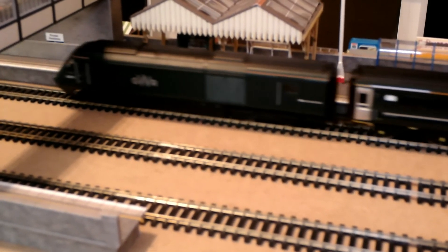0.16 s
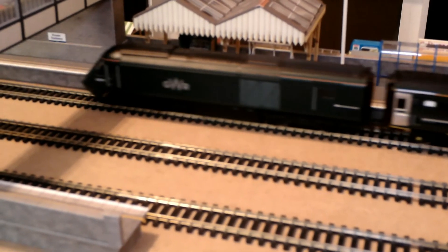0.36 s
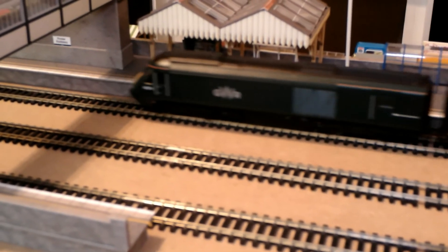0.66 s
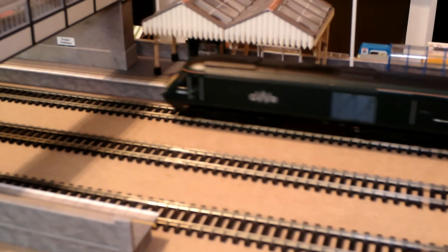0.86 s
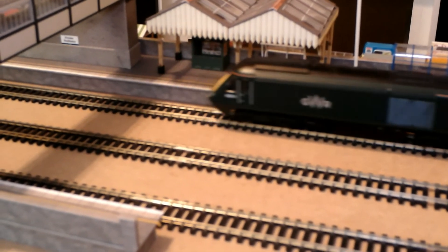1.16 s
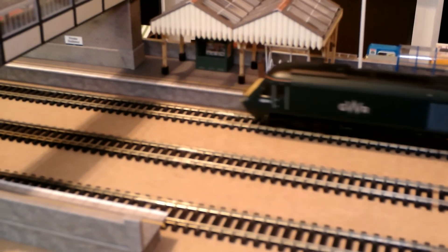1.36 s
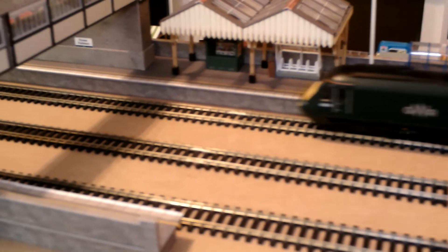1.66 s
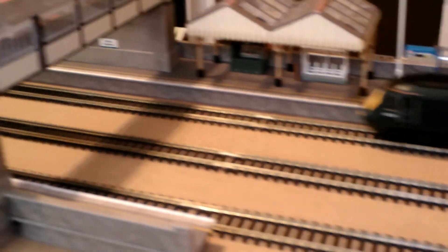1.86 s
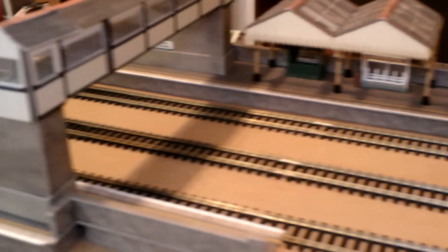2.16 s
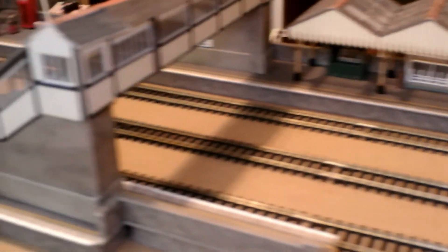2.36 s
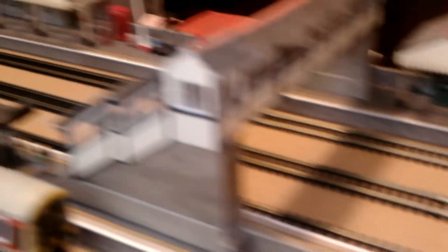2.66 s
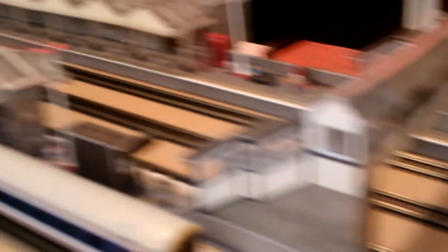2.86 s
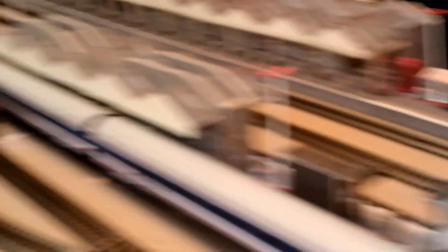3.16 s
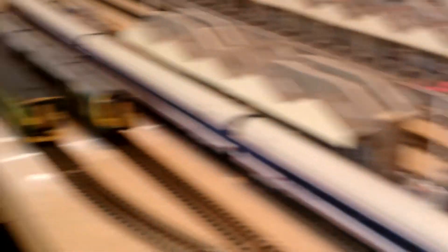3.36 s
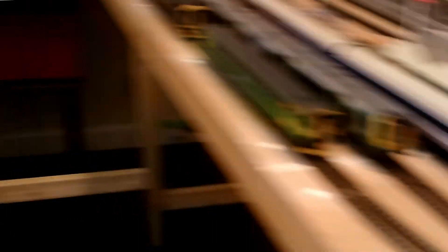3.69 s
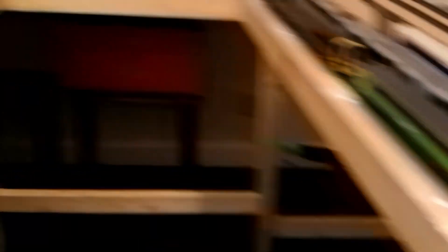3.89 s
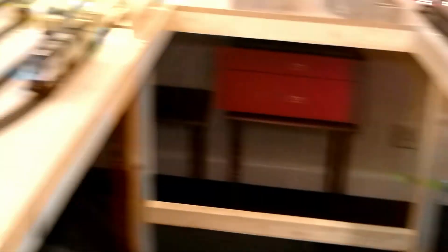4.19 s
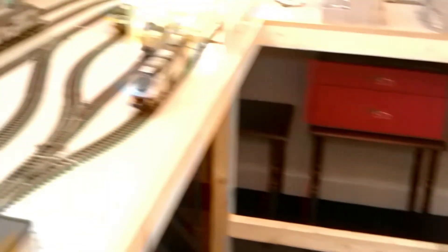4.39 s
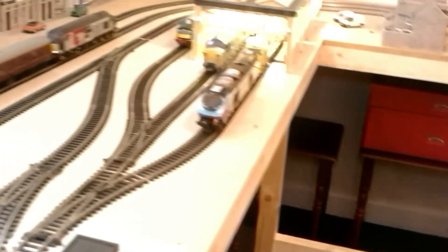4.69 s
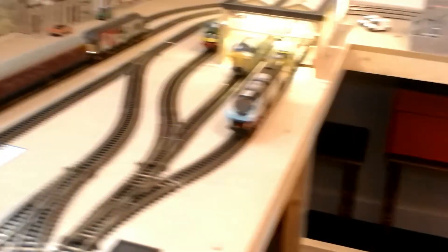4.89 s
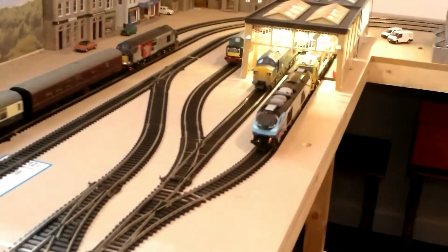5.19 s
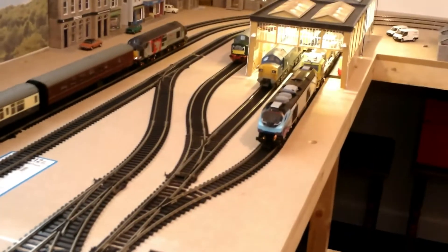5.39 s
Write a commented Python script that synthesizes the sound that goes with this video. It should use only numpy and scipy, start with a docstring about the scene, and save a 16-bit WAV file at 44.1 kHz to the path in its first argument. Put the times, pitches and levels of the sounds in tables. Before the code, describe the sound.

Model trains roll along a layout with a steady wheel rush, one drawing near with rapid gear chatter, clacks and ever harder knocks.

```python
"""Two model trains roll over a wooden baseboard in a small room, one microphone close by.
The first runs away with a rush of small wheels on rough rail that rings in board and track.
The second draws near, knocking ever harder and clacking over rail joints, its drive chattering
some 26 times a second. Behind them the rails hiss, wheel discs sing and motors hum in the board."""
import sys
import numpy as np
from scipy import signal
from scipy.fft import rfft, irfft, next_fast_len
from scipy.io import wavfile
from scipy.ndimage import uniform_filter1d, map_coordinates

SR = 44100
rng = np.random.default_rng(int(sys.argv[2]) if len(sys.argv) > 2 else 0)


def bounce(signal):
    """Save signal as a 16-bit WAV file at the path given by the first command-line argument."""
    frames = np.transpose(np.atleast_2d(signal))
    limited = np.clip(frames, -1, 1)
    pcm = np.round(limited * 32767).astype(np.int16)
    wavfile.write(sys.argv[1], SR, pcm)


N = 244439

# the second train's part of the wheel rush: (time [s], share [0-1])
SECOND_SHARE = [(0, 0.28), (2.2, 0.67), (3.0, 0.4), (4.0, 0.61), (5.54, 1)]
# spectrum of the second train's wheels and gears: (frequency [Hz], level [dB])
SECOND_SPECTRUM = [(500, -57), (620, -11), (760, -4), (980, -3.5), (1200, -2.5), (1450, 8.5), (1750, 4),
                   (2200, 3.5), (2650, -6.5), (3000, -10.5), (3500, -30), (3780, -20.5), (4050, -25),
                   (4500, -85)]


def rolling():
    """Wheels of both trains rush over rough rail; board, body shells and bogies radiate the sound."""
    # strength of each radiating part: (time [s], baseboard [dB], body shells [dB], bogies [dB])
    part_levels = [(0, -35.5, -32, -35), (.11, -38, -35, -37.5), (.19, -34, -30, -33.5),
                   (.28, -33.5, -29.5, -35.5), (.39, -37, -30.5, -27), (.47, -35.5, -30, -31),
                   (.55, -31, -27.5, -29), (.65, -36.5, -29.5, -30), (.72, -33.5, -29, -30.5),
                   (.95, -36, -32.5, -31.5), (1.04, -33, -25.5, -33.5), (1.17, -34.5, -27, -30.5),
                   (1.3, -36, -30, -32.5), (1.42, -33.5, -28.5, -30), (1.68, -36, -32, -33.5),
                   (1.83, -32.5, -30, -29), (2.0, -35, -30, -28.5), (2.1, -36.5, -34.5, -30.5),
                   (2.24, -34, -29, -27), (2.3, -37, -32.5, -33.5), (2.46, -37.5, -35.5, -33.5),
                   (2.62, -37.5, -31, -33.5), (2.7, -38, -33, -37.5), (2.85, -33.5, -33, -33.5),
                   (2.96, -33.5, -34.5, -38), (3.06, -34.5, -34, -33.5), (3.14, -36.5, -37, -32),
                   (3.26, -30.5, -31.5, -33), (3.34, -41.5, -30.5, -36.5), (3.45, -33, -34, -31.5),
                   (4.0, -32.5, -32.5, -32.5), (4.4, -31, -32, -29), (4.7, -33, -35, -34),
                   (4.88, -33.5, -28, -26), (5.15, -31, -29, -25), (5.5, -34, -29, -28.5)]
    # spectrum of the first train's wheels: (frequency [Hz], level [dB])
    first_spectrum = [(500, -41.5), (620, -12.5), (720, -6), (950, -4), (1200, -7), (1420, -27.5),
                      (1620, -8), (1830, -4), (2070, -5.5), (2330, 1), (2650, -7), (3000, -12.5),
                      (3500, -13.5), (4300, -34.5)]
    share = in_time(SECOND_SHARE)[0]
    force = contacts(per_s=5000, spread_db=2.5)
    first = rms_one(coloured(force, first_spectrum))
    second = rms_one(coloured(force, SECOND_SPECTRUM))
    rush = scattered((1 - share) * first + share * second, wet_db=4.0, t60=0.17, count=22)
    sound = from_db(-27) * steadied(rush, smooth_s=0.87) + track() + brief_rings()
    bands_hz = [(560, 1200), (1200, 2100), (2100, 4500)]  # board, shells, bogies
    # each part rattles a little on its own, and all together with the bumps of the rail
    parts = sum(from_db(db + 0.96 * drift(35)) * steadied(band(sound, *edges), smooth_s=0.092)
                for db, edges in zip(in_time(part_levels), bands_hz))
    bumps_db = -0.18 + 0.78 * drift(45)
    duck_db = -2 * share ** 2  # the second train's wheels run more quietly
    return parts * from_db(bumps_db + duck_db)


def track():
    """Each train wakes the resonances of its own stretch of board and track."""
    # resonances under the first train: (frequency [Hz], width [Hz], level [dB])
    first_modes = [(882, 17, -39), (949, 45, -37.5), (1391, 12, -39.5), (1467, 27, -42), (1805, 17, -38),
                   (1900, 28, -43.5), (2270, 12, -42), (2454, 25, -44), (2670, 28, -48), (3350, 220, -50)]
    # their strength as it goes by and away: (time [s], level [dB])
    leaving = [(0, -2.5), (.5, -1.5), (1.3, 0.5), (2.3, -2.5), (3.2, -7.5), (5.5, -24)]
    # resonances under the second train: (frequency [Hz], width [Hz], level [dB])
    second_modes = [(774, 28, -48.5), (946, 45, -37.5), (1120, 67, -42), (1396, 26, -55.5), (1496, 37, -39),
                    (1863, 27, -39.5), (2476, 28, -46.5), (3562, 51, -49.5)]
    first = from_db(in_time(leaving)[0]) * woken(first_modes, swell_db=2.5, smooth_s=0.13)
    second = woken(second_modes, swell_db=5.5, smooth_s=0.47)
    return first + passing(nearest_s=3.63, half_s=0.84) * second


def brief_rings():
    """A passing wheel catches a single resonance, which swells into a short, wavering whine."""
    # caught resonances: (time [s], half length [s], frequency [Hz], width [Hz], level [dB])
    rings = [(0.27, .25, 1410, 10, -38), (0.323, .22, 1680, 9, -38.5), (0.33, 0.34, 1940, 6.9, -38),
             (.8, .22, 1550, 14, -37.5), (1.15, .16, 1436, 12, -39), (1.42, 0.11, 2573, 10, -40),
             (1.9, 0.18, 1840, 14, -41), (1.889, 0.063, 1410, 9.2, -38.5), (2.95, .35, 960, 11, -40),
             (0.41, 0.29, 3100, 23, -46.5), (0.597, 0.37, 3520, 35, -48), (1.2, .25, 3570, 35, -48.5),
             (0.429, 0.074, 2413, 50, -33), (0.735, 0.066, 2500, 17, -33), (0.88, 0.14, 2380, 11, -36),
             (1.2, 0.14, 1824, 20, -32), (1.223, 0.21, 2700, 77, -36.5), (1.44, 0.22, 2275, 5, -32.5),
             (1.846, 0.038, 2700, 34, -40), (2.1, 0.13, 2690, 6.3, -38.5), (2.21, 0.052, 2134, 53, -31),
             (2.238, 0.11, 2450, 33, -32.5), (2.837, 0.1, 1387, 20, -31), (3, 0.17, 1110, 38, -34),
             (3.565, 0.11, 945, 14, -32.5), (3.07, 0.045, 3260, 280, -39), (3.75, .06, 2340, 23, -29.5),
             (4.084, 0.01, 3450, 53, -29), (4.151, .025, 2640, 30, -28), (4.304, 0.031, 1120, 44, -28.5),
             (4.384, 0.035, 1005, 30, -28), (4.552, .025, 815, 30, -31), (5.136, .013, 2820, 60, -30.5)]
    return sum(passing(s, half_s) * woken([mode], swell_db=3.5, smooth_s=0.084)
               for s, half_s, *mode in rings)


def chatter(pulse):
    """Once a turn the gears rub and rattle the second train's body; the teeth add a faint bright edge."""
    # resonances of the body: (frequency [Hz], width [Hz], level [dB])
    body_modes = [(719, 10, 1), (893, 117, 0), (1035, 150, 0.5), (1408, 106, 8.5), (1495, 16, 3),
                  (1600, 48, -9.5), (1570, 20, -18), (2050, 32, 10), (2230, 47, -2), (2504, 30, 4),
                  (2700, 44, -2), (2800, 17, -3.5), (3270, 180, 4)]
    # spectrum of the gear teeth: (frequency [Hz], level [dB])
    teeth_spectrum = [(3300, -5), (3600, -5), (4050, 3), (4400, -19), (5500, -8.5), (6300, -12.5)]
    # strength of the chatter: (time [s], body [dB], gears [dB])
    levels = [(3.24, -31.5, -44), (3.6, -34.5, -35), (3.98, -33, -34), (4.12, -32, -29.5),
              (4.33, -25.5, -28.5), (4.45, -29.5, -40), (4.7, -28.5, -35), (4.84, -25.5, -27.5),
              (5.2, -26.5, -30), (5.5, -28, -29)]
    force = contacts(per_s=5000, spread_db=2.0)
    ring = ringing(band(force, 600, 2760), body_modes, wander_db=4.0)
    rasp = rms_one(coloured(force, SECOND_SPECTRUM)) + from_db(13) * ring
    body = steadied(band(rasp, 616, 2160), smooth_s=0.006)
    teeth = from_db(-14.5) * rms_one(coloured(force, teeth_spectrum))
    gears = steadied(band(rasp, 2250, 4900), smooth_s=0.018) + teeth
    body_db, gears_db = in_time(levels)
    return pulse * (from_db(body_db) * body + from_db(gears_db) * gears)


def drive_turns():
    """One swell for each turn of the second train's drive, a little uneven and with a slight limp."""
    start_s, turn_s, jitter_s = 3.236, 0.03838, 0.0018
    limp_db, scatter_db = -0.5, 1.6
    turn = np.arange(int((N / SR - start_s) / turn_s) + 1)
    late, strength = rng.standard_normal((len(turn), 2)).T
    times = start_s + turn * turn_s + jitter_s * late
    levels = limp_db * (-1) ** turn + scatter_db * strength
    return sum(from_db(db) * burst(s, rise_s=0.0066, fall_s=0.011) for s, db in zip(times, levels))


def knocks():
    """A jolt shakes the main mode of the second train's body and rattles the upper modes of its shell."""
    # jolts: (time [s], peak [dB], pitch [Hz], fall [s], shell rattle [dB])
    jolts = [(2.775, -25, 1430, .016, -42), (2.818, -29, 1465, .012, -41), (2.855, -26, 1460, .008, -42),
             (2.877, -26, 1410, 0.0055, -46), (3.038, -24, 1480, .014, -35), (3.24, -29, 948, 0.021, -44),
             (3.272, -25, 1365, .012, -38), (3.478, -26, 980, 0.0072, -28), (3.629, -22, 943, 0.0091, -31),
             (3.817, -24, 960, 0.0057, -33), (3.857, -24, 1400, 0.0068, -35), (3.931, -31, 1400, .006, -29),
             (3.969, -24, 900, 0.019, -31), (4.075, -20, 1365, .012, -28), (4.231, -27, 1400, .006, -35),
             (4.303, -17.5, 1290, .006, -33), (4.379, -18.5, 1325, .007, -22.5),
             (4.458, -18.5, 1387, .007, -34), (4.535, -20, 1360, 0.0072, -39), (4.586, -21, 1415, .01, -46),
             (4.61, -19.5, 1420, .006, -34), (4.657, -25, 1420, 0.0077, -28),
             (4.764, -16, 1450, 0.0079, -24.5), (4.805, -19, 1508, 0.011, -31),
             (4.841, -11, 1510, .009, -18), (4.886, -16.5, 1444, .007, -21.5),
             (4.92, -20, 1552, 0.0043, -36), (4.963, -26, 1550, .008, -28),
             (4.998, -7, 1587, 0.0047, -19.5), (5.04, -12.5, 1460, 0.0076, -27),
             (5.087, -23, 1470, .008, -23), (5.12, -24, 1500, .012, -24.5), (5.157, -19, 1515, .009, -22.5),
             (5.195, -21.5, 1480, 0.011, -25.5), (5.227, -15, 1546, 0.0068, -22),
             (5.308, -15, 1508, 0.014, -28), (5.356, -16.5, 1494, .009, -24),
             (5.386, -7.5, 1498, 0.0046, -35), (5.425, -21, 1490, 0.011, -35),
             (5.463, -17.5, 1517, .008, -30), (5.514, -20, 1490, 0.015, -21.5)]
    # upper modes of the shell: (frequency [Hz], width [Hz], level [dB])
    shell_modes = [(2210, 51, -0.5), (2495, 64, 4.5), (2688, 65, 4), (2940, 55, -8), (3236, 70, -5.5),
                   (3544, 63, -7), (3830, 120, -20)]
    phase_per_hz = 2 * np.pi * np.cumsum(1 + 0.035 * drift(300)) / SR  # the pitch wavers
    shell = ringing(contacts(per_s=5000, spread_db=3.0), shell_modes, wander_db=4.0)
    shell = steadied(band(shell, 1850, 4080), smooth_s=0.0089)
    out = np.zeros(N)
    for s, db, hz, fall_s, shell_db in jolts:
        out += from_db(db) * burst(s, rise_s=0.0032, fall_s=fall_s) * np.sin(hz * phase_per_hz)
        out += from_db(shell_db) * burst(s, rise_s=0.0039, fall_s=0.0088) * shell
    return out


def rail_joints():
    """A wheel drops over a rail joint: a short clack with a metallic ring."""
    # wheel drops: (time [s], level [dB])
    drops = [(3.404, -27.5), (3.705, -25), (3.746, -19), (3.763, -28), (4.043, -26), (4.081, -19),
             (4.124, -25), (4.153, -23)]
    # spectrum of the clack: (frequency [Hz], level [dB])
    spectrum = [(700, -3), (950, -5), (1500, -2), (2500, 7), (3000, -2), (3600, -1.5), (4200, -15)]
    # resonances of rail and bogie: (frequency [Hz], width [Hz], level [dB])
    modes = [(1880, 77, -1.5), (2190, 79, 3), (2600, 65, -3), (3480, 60, -7)]
    force = contacts(per_s=4500, spread_db=1.5)
    ring = ringing(band(force, 1180, 3850), modes, wander_db=1.0)
    clack = rms_one(coloured(force, spectrum)) + from_db(-0.5) * ring
    clack = steadied(scattered(clack, wet_db=3.0, t60=0.053, count=6), smooth_s=0.0095)
    return clack * sum(from_db(db) * burst(s, rise_s=0.004, fall_s=0.014) for s, db in drops)


def rails(pulse):
    """Metal slides on metal: a fine hiss that swells with each turn of the drive, and singing discs."""
    # strength of the hiss: (time [s], level [dB])
    levels = [(0, -51), (.3, -49), (.6, -50), (.8, -51), (1.15, -49.5), (1.45, -50.5), (2.1, -50),
              (2.35, -51.5), (2.9, -52), (3.1, -50.5), (3.35, -53.5), (3.5, -51), (3.78, -50), (4.0, -55),
              (4.35, -51.5), (4.6, -56), (4.9, -52), (5.5, -50.5)]
    # spectrum of the hiss: (frequency [Hz], level [dB])
    spectrum = [(2800, -4), (3900, -0.5), (4700, 4.5), (5300, 0), (6600, 2), (7300, -1), (7800, -9),
                (8400, -9), (8750, -6), (9300, -10), (9900, -17), (12000, -22), (14800, -24),
                (15500, -38.5)]
    force = contacts(per_s=20000, spread_db=3.0)
    hiss = from_db(in_time(levels)[0]) * rms_one(coloured(force, spectrum))
    singing = wheel_discs()
    flutter = from_db(1.43 * drift(50))
    return flutter * ((1 + 0.23 * pulse) * hiss + singing)


def wheel_discs():
    """One wheel disc sings loudest, two others above and below it; each wavers in pitch and strength."""
    # discs singing on the rails: (time [s], level [dB], pitch [Hz])
    song = [(.12, -72, 6170), (.3, -57, 6150), (.58, -52.5, 6160), (.9, -59, 6230), (1.15, -56, 6190),
            (1.6, -55, 6150), (2.25, -61, 6270), (2.8, -64, 6170), (3.2, -57.5, 6170), (3.47, -57, 6180),
            (3.65, -56, 6160), (3.77, -47, 6160), (3.9, -58, 6190), (4.2, -55, 6130), (4.65, -61, 6130),
            (4.97, -52, 6150), (5.15, -58, 6190), (5.29, -50, 6210), (5.5, -60, 6180)]
    level_db, pitch_hz = in_time(song)
    wander_hz, waver_db = 18, 4.5
    out = np.zeros(N)
    for offset_hz, db in [(-80, -6), (0, 0), (80, -6)]:
        hz = pitch_hz + offset_hz + wander_hz * (drift(12) + drift(150))
        out += from_db(db + waver_db * drift(25)) * np.sin(2 * np.pi * np.cumsum(hz) / SR)
    return from_db(level_db) * rms_one(out)


def baseboard():
    """Motors and wheels make the board hum in its lowest modes and rumble."""
    # strength of the board's sound: (time [s], motor hum [dB], rumble [dB])
    levels = [(0, -53.5, -48), (.9, -49.5, -47), (2.6, -51.5, -47.5), (3.4, -50.5, -49.5), (4.3, -51, -50),
              (5.15, -49, -47.5)]
    # spectrum of the rumble: (frequency [Hz], level [dB])
    spectrum = [(20, -9), (50, -12), (80, -6), (110, 0.5), (160, -20.5), (240, 0), (350, -1), (520, 2),
                (650, -3.5), (1000, -7.5)]
    # lowest modes of the board: (frequency [Hz], width [Hz], level [dB])
    modes = [(134, 13, -3.5), (205.3, 9.1, -5.5)]
    hum_db, rumble_db = in_time(levels)
    rumble = rms_one(coloured(rng.standard_normal(N), spectrum)) * dips(share=0.98)
    hum = ringing(band(rng.standard_normal(N), 65, 313), modes, wander_db=4.5)
    return from_db(rumble_db) * rumble + from_db(hum_db) * steadied(hum, smooth_s=0.22)


def dips(share):
    """Gain that sinks briefly at each dip, by `share` of its depth."""
    # dips of the treble and the rumble: (time [s], depth [dB])
    depths = [(.5, 4), (0.865, 9), (.949, 8), (1.058, 4), (1.355, 12), (1.8, 4), (1.877, 55), (3.597, 6),
              (3.678, 5), (4.084, 10), (4.586, 61), (5.13, 13)]
    t, half_s = np.arange(N) / SR, 0.011
    return from_db(-share * sum(db * np.exp(-np.abs((t - s) / half_s) ** 3) for s, db in depths))


def room(x, t60, wet_db):
    """Direct sound reaches the microphone with a short diffuse tail behind it."""
    age = np.arange(SR // 2) / SR
    tail = rng.standard_normal(len(age)) * from_db(-60 * age / t60) * (age > .004)
    return x + from_db(wet_db) * signal.fftconvolve(x, tail / np.linalg.norm(tail))[:N]


def scattered(x, wet_db, t60, count):
    """Echoes off the layout change as the train moves: `count` echo patterns, blended in turn."""
    place = np.linspace(0, count - 1, N)
    return sum(np.sqrt(np.maximum(1 - np.abs(place - k), 0)) * room(x, t60, wet_db) for k in range(count))


def contacts(per_s, spread_db):
    """Tiny impacts of rough surfaces, at random times and of uneven size."""
    sizes = from_db(spread_db * np.minimum(rng.exponential(1, N), 4)) * rng.choice([-1, 1], N)
    return rms_one(sizes * (rng.random(N) < per_s / SR))


def ringing(force, modes, wander_db):
    """Modes driven by one force; each swells and fades a little as the train moves."""
    return rms_one(sum((-1) ** k * from_db(db + wander_db * drift(7.7)) * resonance(force, hz, width)
                       for k, (hz, width, db) in enumerate(modes)))


def woken(modes, swell_db, smooth_s):
    """Modes kept ringing by the wheels; each swells and fades as they move along the track."""
    out = np.zeros(N)
    for hz, width, db in modes:
        ring = resonance(resonance(rng.standard_normal(N), hz, width), hz, 6 * width)
        out += from_db(db + swell_db * drift(4.125)) * steadied(ring, smooth_s)
    return out


def steadied(x, smooth_s):
    """Many contacts share the load, so the strength of their sound stays even, near rms 1."""
    power = uniform_filter1d(x * x, max(int(smooth_s * SR), 1))
    return x / np.sqrt(np.maximum(power, 0) + np.mean(x * x) / 100)


def passing(nearest_s, half_s):
    """Gain of something going by: 1 at its nearest, a half at `half_s` on either side."""
    return 1 / (1 + ((np.arange(N) / SR - nearest_s) / half_s) ** 4)


def burst(s, rise_s, fall_s):
    """Envelope that swells from time s and dies away."""
    out, age = np.zeros(N + SR), np.arange(SR // 10) / SR
    rise, fall = np.sin(np.pi / 2 * age / rise_s), np.exp((rise_s - age) / fall_s)
    start = int(s * SR)
    out[start:start + len(age)] = np.where(age < rise_s, rise, fall)
    return out[:N]


def resonance(x, hz, width):
    """Two-pole resonance with gain 1 on top."""
    r = np.exp(-np.pi * width / SR)
    feedback = [1, -2 * r * np.cos(2 * np.pi * hz / SR), r * r]
    return signal.lfilter(np.array([1, 0, -1]) * (1 - r * r) / 2, feedback, x + 1e-18)


def coloured(x, spectrum):
    """Shape x by a spectrum whose ends fall away at 36 dB an octave."""
    hz, db = np.transpose(spectrum)
    size = next_fast_len(N + SR // 10)
    octave = np.log2(np.maximum(np.fft.rfftfreq(size, 1 / SR), 1))
    outside = np.abs(octave - np.clip(octave, np.log2(hz[0]), np.log2(hz[-1])))
    gain = from_db(np.interp(octave, np.log2(hz), db) - 36 * outside)
    return irfft(rfft(x, size) * gain, size)[:N]


def band(x, low_hz, high_hz):
    """Steep band-pass."""
    return signal.sosfilt(signal.butter(5, [low_hz, high_hz], "band", fs=SR, output="sos"), x)


def drift(rate):
    """Random wander with rms 1 through `rate` new values a second."""
    knots = rng.standard_normal(2000)
    return rms_one(map_coordinates(knots, [np.arange(N) / SR * rate], order=1, mode="mirror"))


def in_time(rows):
    """Each column of a curve, at every sample."""
    s, *columns = np.transpose(rows)
    return [np.interp(np.arange(N) / SR, s, c) for c in columns]


def from_db(db):
    """Decibels to gain."""
    return 10 ** (np.asarray(db) / 20)


def rms_one(x):
    """Scale to unit rms."""
    return x / np.sqrt(np.mean(x ** 2) + 1e-20)


def scene():
    """Both trains from close by, in mono; the dips spare the loud middle of the spectrum."""
    pulse = drive_turns()
    clatter = chatter(pulse) + knocks() + rail_joints()
    trains = rolling() + room(clatter, t60=0.12, wet_db=-12)
    middle = signal.sosfiltfilt(signal.butter(10, 3650, fs=SR, output="sos"), trains)
    treble = trains - middle + rails(pulse)
    return (middle + dips(share=1.0) * treble + baseboard())[None]


def record(dry):
    """The top is cut steeply above 15.6 kHz."""
    return signal.sosfilt(signal.ellip(10, .1, 80, 15600, fs=SR, output="sos"), dry)


dry = scene()
out = record(dry)
bounce(out)
```